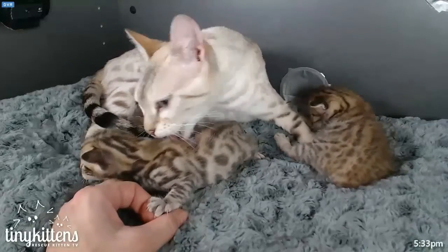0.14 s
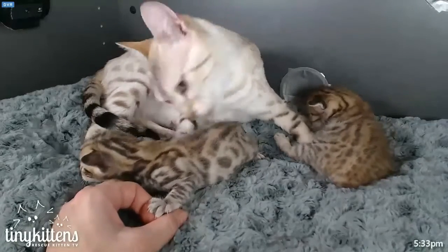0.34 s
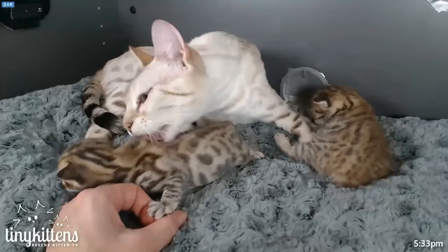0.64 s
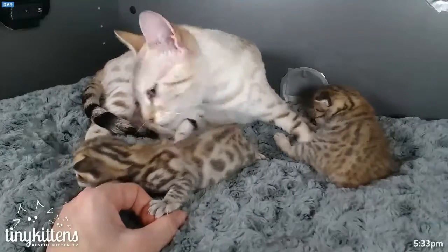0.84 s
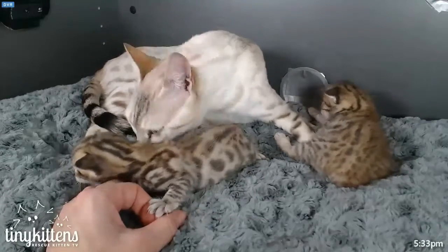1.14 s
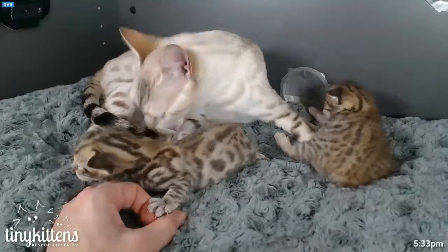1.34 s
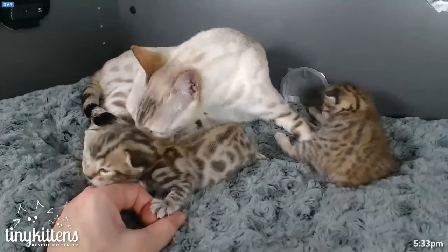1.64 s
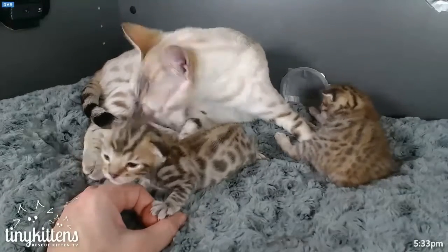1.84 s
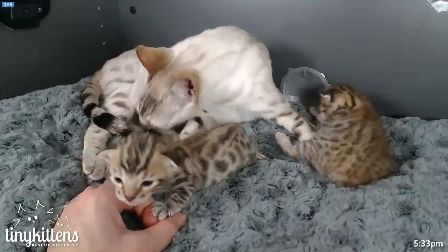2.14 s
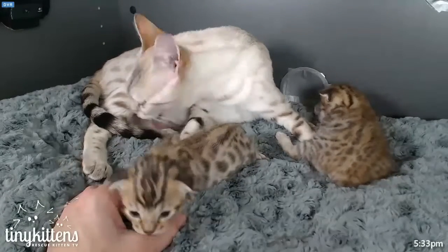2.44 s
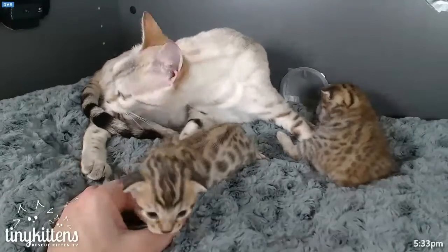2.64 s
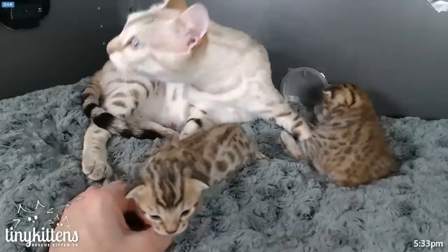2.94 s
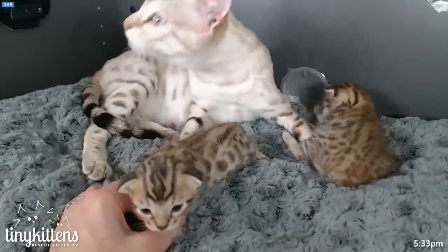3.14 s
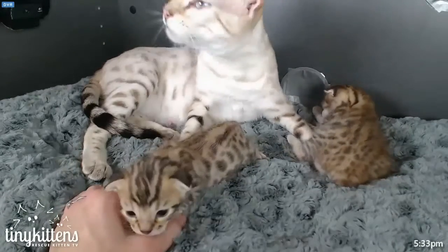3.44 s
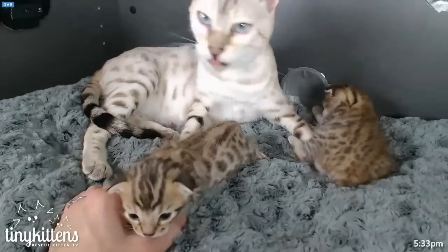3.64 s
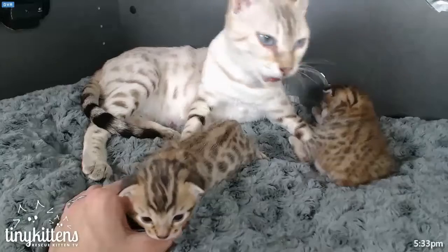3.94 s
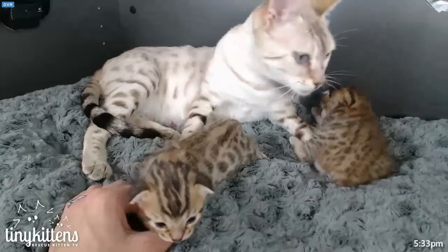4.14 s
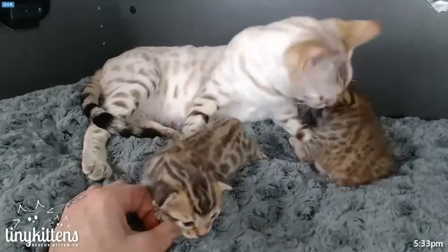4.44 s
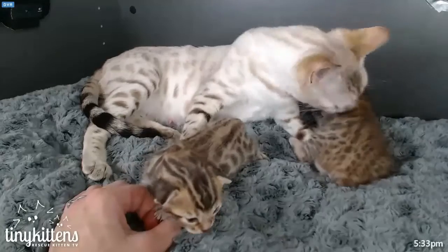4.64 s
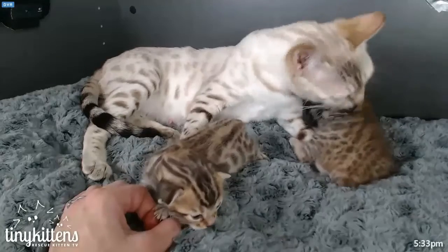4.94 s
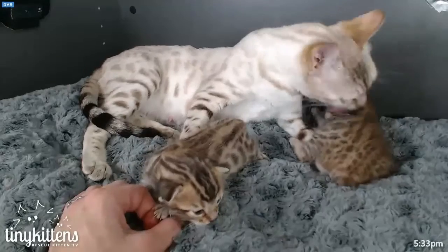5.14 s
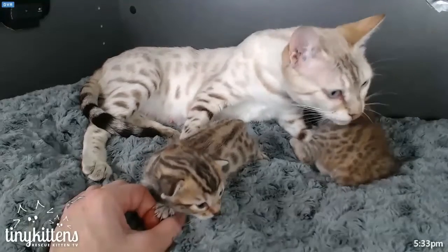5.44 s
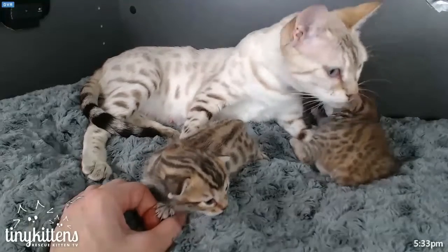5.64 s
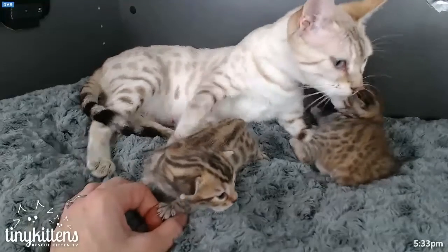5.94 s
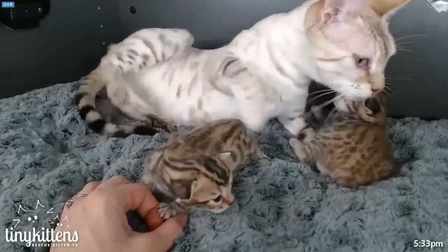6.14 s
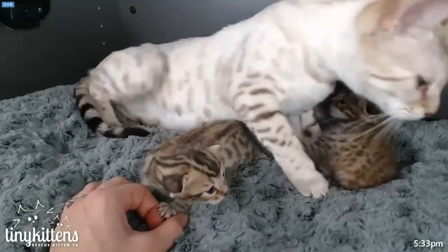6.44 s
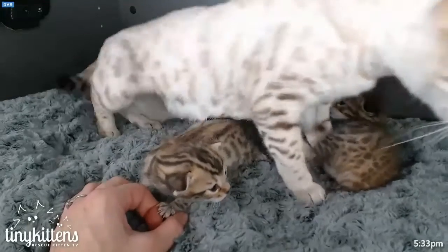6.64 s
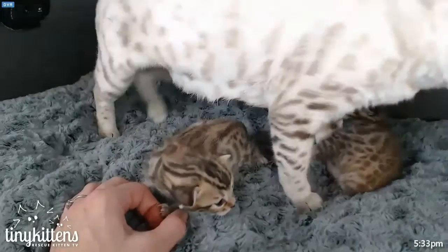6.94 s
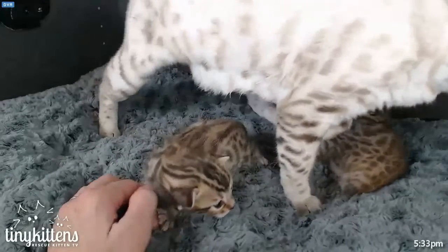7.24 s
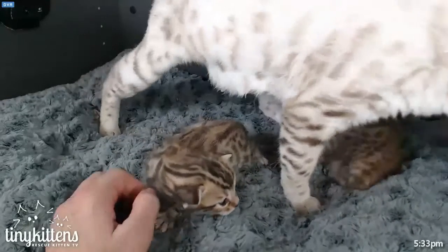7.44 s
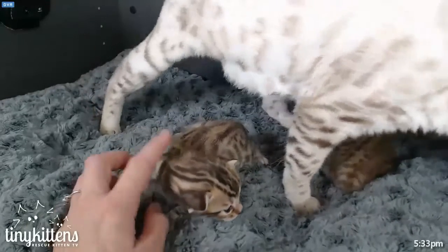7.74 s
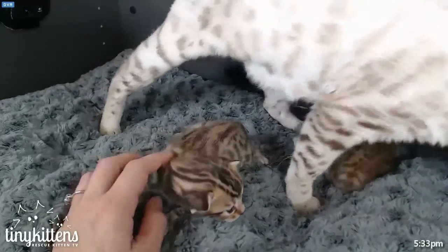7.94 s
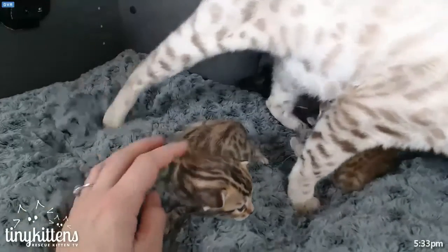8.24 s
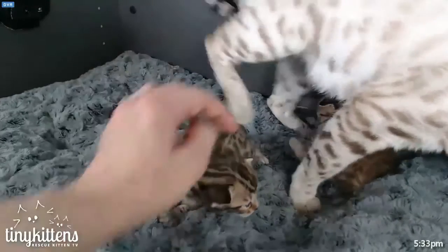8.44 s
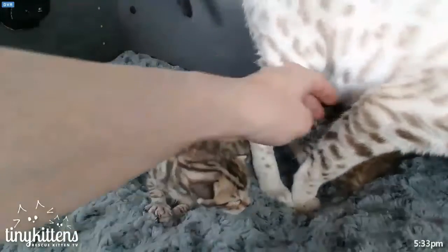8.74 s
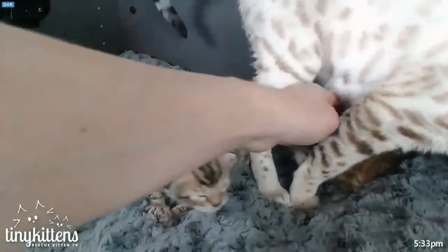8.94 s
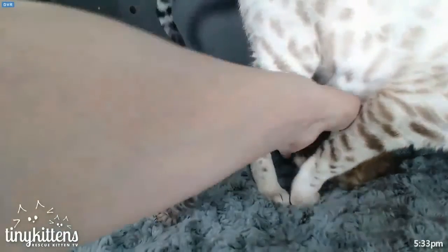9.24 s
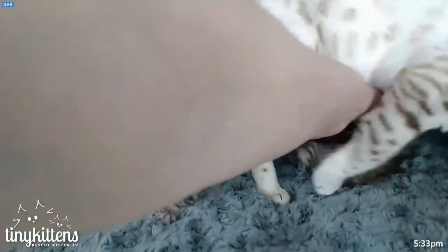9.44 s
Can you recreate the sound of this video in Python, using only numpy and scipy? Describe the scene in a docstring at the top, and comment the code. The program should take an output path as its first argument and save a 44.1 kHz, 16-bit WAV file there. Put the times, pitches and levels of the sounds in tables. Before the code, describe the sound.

A mother cat purrs close to the microphone in a small room, a low flutter that swells and fades with each breath. Her tongue brushes and smacks softly on fur, and the bedding gives a few dull bumps. A little past halfway a kitten lets out one tiny squeak. Toward the end the purr turns raspier and rattles in her throat. A faint appliance hum lies underneath.

```python
"""Purring mother cat with her kittens

A mother cat purrs while she licks her kittens on a plush blanket, then stands up and is stroked.
Her purr is a train of soft chest thumps, each with a puff of air that rasps in her throat.
Tongue and paws brush, smack and tick on the fur, the bed bumps and rumbles, and one kitten squeaks.
Under it all an appliance hums in the small room, along with a thin electronic whine."""
import sys
import numpy as np
from scipy import signal
from scipy.fft import rfft, irfft
from scipy.io import wavfile
from scipy.ndimage import uniform_filter1d

SR = 44100
rng = np.random.default_rng(int(sys.argv[2]) if len(sys.argv) > 2 else 0)


def transcribe(u):
    """Save the signal u as a 16-bit wav file named by the first command-line argument.

    u: samples, shape (n,) or (channels, n), limited to [-1, 1]; the rate is SR.
    q: integer samples, one column per channel.
    """
    v = np.clip(np.atleast_2d(u).T, -1, 1)
    q = np.round(v * 32767).astype(np.int16)
    wavfile.write(sys.argv[1], SR, q)


N = 423915
TIME = np.arange(N) / SR

# Colour of the room air. Each row: frequency in Hz, relative gain in dB.
AIR_EQ = [(10, -26.5), (25, 0), (55, 0), (100, 0), (150, -2.5), (205, -19), (300, -19.5), (380, -23.5),
          (450, -18.5), (560, -25), (690, -22), (850, -27.5), (1300, -30.5), (2000, -37), (3200, -38),
          (4500, -47), (6300, -49), (8000, -52.5), (10500, -55.5)]
# Mains hum and the appliance's faint motor tones. Each row: frequency in Hz, level in dB.
HUM_TONES = [(119.8, -55.2), (420, -84), (463, -82.5), (631, -84), (700, -85), (1109, -91), (1237, -92)]
# Electronic whines. Each row: frequency in Hz, level in dB, phase swing in radians, throb from 0 to 1.
WHINE_TONES = [(5475, -88.3, 1.57, 0), (5000, -100.5, 0, 0), (5599, -101.5, 0, 0), (6998, -106, 0, 0),
               (7999, -105, 0, .9), (10524, -103, 1.57, 0)]
# Rumble of the bed as the cat shifts and stands. Each row: time in seconds, level in dB.
RUMBLE_LEVELS = [(0, -65), (1.5, -61), (2.5, -68), (5.5, -71.5), (6.3, -59.5), (7.1, -71), (7.7, -68),
                 (8.3, -57.5), (9, -66), (9.6, -53)]
# Colour of that rumble. Each row: frequency in Hz, relative gain in dB.
RUMBLE_EQ = [(10, -19.5), (25, 6.0), (55, -1.5), (80, -5.5), (130, -21.5), (400, -60.0)]

# Swells of the purr, one or more to a breath. Each row: start in seconds, pulses per second,
# time to the crest in seconds, thump level in dB, rasp level in dB.
PURR_SWELLS = [(.005, 28.7, .08, -46, -70), (.419, 32.4, 0, -47.5, -78), (.551, 28.4, 0, -42.5, -76),
               (.885, 31, .01, -52.5, -78), (1.13, 28.8, .12, -44, -75), (1.408, 31, .03, -48, -79),
               (1.677, 28.7, .07, -49, -80), (1.924, 29.3, .03, -51, -79), (2.302, 28, .06, -44.5, -74),
               (2.654, 26.7, .03, -42.5, -77), (2.906, 30.7, .07, -49, -76), (3.183, 29.2, .04, -42.5, -73),
               (3.385, 29.5, .01, -47.5, -77), (3.635, 30, .11, -47.5, -75), (4.183, 28.4, .2, -41.5, -72),
               (4.466, 27.7, .12, -39, -71.5), (4.93, 29, .03, -48, -73), (5.273, 28.4, .03, -44.5, -73),
               (5.519, 32.9, 0, -50.5, -76), (5.783, 28.4, .06, -45.5, -75), (6.122, 31, .03, -52, -76),
               (6.426, 29.2, .03, -45.5, -75), (6.635, 31, 0, -48, -77), (6.795, 31, .05, -55, -74),
               (7.077, 28.4, 0, -45.5, -73.5), (7.183, 28.4, 0, -47.5, -75), (7.385, 31, .04, -54, -77),
               (7.63, 28.3, .09, -47, -75), (7.885, 31, 0, -51, -78), (8.157, 28.1, .12, -47, -69),
               (8.545, 27.3, 0, -42.5, -69), (8.656, 27.3, .11, -51, -67), (8.94, 27.3, 0, -44, -68),
               (9.26, 28.5, .06, -52, -65), (9.517, 26.2, .01, -47, -65)]
# Pitch of the chest thump, which drops as she stands. Each row: time in seconds, pitch in Hz.
CHEST_PITCH = [(0, 131), (4.6, 134), (6.2, 133), (6.9, 125), (9.6, 130)]
# How far her mouth is open. Each row: time in seconds, opening from 0 to 1.
MOUTH_OPENING = [(0, 0), (2.5, 0.32), (3.3, 0.64), (4.5, 0.14), (6.7, 0.06), (7.7, 0.8), (8.25, 0.9),
                 (9.6, 0.9)]
# Colours of the tissue flutter and of the rasp with the mouth shut and open.
# Each row: frequency in Hz, relative gain in dB.
FLUTTER_EQ = [(130, -14), (220, 1), (305, 5), (390, -3), (495, 3), (560, -8), (700, -17), (1200, -32),
              (3000, -55)]
MOUTH_SHUT_EQ = [(100, -18), (220, -2.5), (300, -4.5), (370, -5.5), (470, 5), (570, -5.5), (690, -10.5),
                 (850, -20), (1200, -12.5), (2000, -12.5), (3600, -18.5), (6000, -24), (11000, -34)]
MOUTH_OPEN_EQ = [(100, -22), (200, 0), (270, 23), (340, -5.5), (430, -4), (530, 0), (700, -6.5),
                 (1050, 2.5), (1370, 5), (1650, -18.5), (3300, -13.5), (6000, -18.5), (11000, -34)]

# Tongue and paws brush fur and blanket. Each row: start and end in seconds, then the levels of
# dull body, rasp and fizz in dB.
FUR_RUBS = [(0.047, 0.278, -71, -82, -94), (0.387, 0.647, -79, -77.5, -87.5),
            (0.877, 1.05, -82, -79.5, -84), (1.182, 1.342, -71, -93, -101), (2.025, 2.059, -61, -73, -80),
            (2.66, 2.75, -72, -83, -82.5), (2.837, 2.968, -66.5, -78, -81), (3.186, 3.336, -72, -86, -84),
            (3.606, 3.87, -63.5, -75, -81), (3.922, 3.947, -60.5, -71, -76.5),
            (3.955, 4.133, -79, -77, -83), (4.905, 5.24, -63.5, -76.5, -85), (5.284, 5.304, -56, -69, -76),
            (5.526, 5.696, -64, -74.5, -83), (5.8, 5.857, -59, -74, -90), (5.979, 5.989, -58.5, -66, -73.5),
            (6.142, 6.185, -64, -79, -86), (6.175, 6.274, -53, -67.5, -79.5),
            (6.258, 6.375, -61.5, -77, -86), (6.434, 6.531, -63.5, -72, -88), (6.513, 6.51, -65, -59, -64),
            (7.049, 7.192, -76, -77, -92), (7.41, 7.55, -68.5, -82, -90), (8.231, 8.312, -63, -74, -80),
            (8.423, 8.49, -66, -76, -92), (8.688, 8.895, -66, -78, -93), (9.238, 9.46, -66, -76, -86.5)]
# Colours of those three bands. Each row: frequency in Hz, relative gain in dB.
FUR_BODY_EQ = [(80, -18.5), (230, 15.5), (400, 4.5), (620, 5), (800, -3), (1100, -2.5), (1500, -4.5),
               (2200, -44), (5000, -50.5)]
FUR_RASP_EQ = [(600, -10), (1500, 4.5), (2300, 6), (2700, 2.5), (3300, 0.5), (4200, -5), (5500, -13),
               (8000, -35.5)]
FUR_FIZZ_EQ = [(2500, -12), (5000, 2.5), (6300, 3.5), (8000, -6.5), (9800, -2), (11000, -19)]
# Wet smacks of the tongue. Each row: start in seconds, length in seconds, level in dB,
# mouth resonance in Hz, its width in Hz.
TONGUE_SMACKS = [(0.047, 0.02, -61.5, 2033, 710), (0.397, .016, -74, 3050, 600),
                 (0.425, .018, -75, 3100, 900), (0.461, 0.018, -73, 3190, 900),
                 (0.461, 0.027, -70, 1330, 300), (.488, .014, -75, 2900, 1600),
                 (0.905, .022, -72, 1290, 200), (.917, .012, -72, 2600, 1400),
                 (0.942, 0.016, -62.5, 2290, 1200), (0.976, 0.014, -62, 3270, 420),
                 (0.976, 0.015, -66, 1900, 1400), (1.006, 0.02, -67, 2710, 1100),
                 (1.219, 0.013, -68.5, 2020, 1200), (1.626, 0.008, -64.5, 2440, 900),
                 (1.756, 0.045, -77.5, 2940, 700), (2.674, 0.014, -66, 3270, 1300),
                 (2.708, 0.02, -65.5, 2880, 750), (2.858, 0.017, -65, 3380, 800),
                 (2.882, 0.027, -67.5, 3440, 500), (2.897, 0.024, -70, 2440, 500),
                 (2.925, .018, -72, 2720, 1000), (3.21, 0.15, -77, 1547, 350),
                 (3.645, 0.071, -73.5, 1490, 300), (3.733, .055, -72.5, 1370, 500),
                 (3.808, 0.047, -72, 1432, 400), (3.808, 0.013, -69.5, 3420, 900),
                 (3.919, .012, -69, 1500, 700), (4.06, 0.02, -69.5, 2710, 1100),
                 (4.092, 0.053, -76.5, 3410, 700), (4.236, 0.011, -68.5, 3500, 1200),
                 (4.643, 0.006, -69.5, 3860, 900), (4.781, 0.03, -70.5, 2990, 804),
                 (5.017, 0.013, -68, 2610, 1400), (5.051, .012, -69, 2720, 1400),
                 (5.14, .016, -71, 1500, 700), (5.248, .01, -70.5, 3060, 1100),
                 (5.284, 0.018, -59.5, 2220, 700), (5.285, 0.024, -70, 3300, 500),
                 (5.561, .018, -71.5, 2980, 900), (5.594, .017, -67.5, 2630, 1200),
                 (5.625, .018, -68.5, 2700, 1100), (5.658, 0.017, -72.5, 2510, 1300),
                 (6.511, .008, -61, 2790, 2200), (8.25, 0.072, -72.5, 2900, 900)]
# Ticks of tongue, lips and claws in the pile. Each row: start in seconds, relative level in dB,
# brightness in dB.
SMALL_TICKS = [(0.0472, -56.5, -11.5), (0.611, -68, -8), (1.2222, -65.5, -10), (1.256, -71, -9),
               (1.5174, -66, 3.5), (2.0403, -64.5, -10), (2.1162, -67, 1), (2.526, -79, 10),
               (2.6735, -68, -14), (2.7018, -68, 2), (2.999, -71.5, 1.5), (3.1509, -63.5, -14.5),
               (3.228, -74, -2), (4.28, -72, -5), (4.619, -67, -5), (5.2822, -63.5, -14.5),
               (5.811, -65, -15), (6.054, -74, 4), (6.063, -66, 7), (6.5129, -57, -5), (6.9728, -75, -1),
               (9.1576, -76.5, 8.5), (9.3774, -72, 7)]
# Colour of a tick's hollow knock. Each row: frequency in Hz, relative gain in dB.
TICK_KNOCK_EQ = [(80, -16.5), (230, -6), (400, 5), (540, 9.5), (750, -0.5), (1000, -1), (1500, -2.5),
                 (2200, -38), (5000, -52.5)]
# Paws and bodies bump the bedding. Each row: start in seconds, level in dB, pitch in Hz,
# length in seconds.
BED_BUMPS = [(1.771, -49.5, 217, 0.021), (2.034, -47.5, 213, 0.039), (2.187, -56, 206, 0.052),
             (2.875, -52, 210.5, 0.076), (4.996, -51.5, 235, 0.084), (5.052, -59, 332, 0.044),
             (5.128, -57.5, 322, 0.045), (8.698, -53, 250, 0.04), (8.858, -54.5, 255, 0.031),
             (6.018, -44, 140, .022), (6.222, -40.5, 168, 0.04), (6.224, -51, 350, .02),
             (6.885, -59, 285, .035)]

# Arc of the kitten's squeak. Each row: time in seconds, pitch in Hz, level in dB.
SQUEAK_ARC = [(6.012, 1020, -76), (6.017, 1075, -57), (6.03, 1102, -55.5), (6.042, 1065, -57),
              (6.047, 950, -66), (6.054, 860, -65), (6.06, 800, -76)]
# Timbre of the squeak. Each row: harmonic number, relative level in dB.
SQUEAK_HARMONICS = [(1, -9), (2, -3), (3, 0), (4, -20), (5, -29), (6, -30), (7, -31), (8, -30), (9, -26)]
# Single purr pulses rattle in her throat once she stands. Each row: start in seconds, then the
# relative levels of body and ring in dB.
THROAT_RATTLES = [(7.69, -54, -69), (7.727, -51, -75), (7.762, -58, -75), (8.15, -56, -69),
                  (8.182, -57, -65), (8.293, -59, -70), (8.397, -51, -69), (8.432, -49, -72),
                  (8.471, -53, -69), (8.578, -53, -73), (8.596, -47, -59), (8.684, -52, -68),
                  (8.718, -61, -73), (8.753, -52, -68), (8.789, -46.5, -61), (8.86, -53, -81),
                  (8.965, -64, -65), (9.002, -55, -60), (9.038, -52, -71), (9.309, -46, -58),
                  (9.351, -61, -59), (9.381, -68, -69), (9.412, -51, -65), (9.45, -53, -66),
                  (9.537, -56, -61.5), (9.584, -51, -61.5)]
# Colours of a rattle's hollow body and its ring in the mouth. Each row: frequency in Hz, gain in dB.
RATTLE_BODY_EQ = [(120, -13), (200, -3), (275, 10), (480, -1), (720, 8.5), (1000, -15), (1650, -19),
                  (3500, -25), (9000, -38)]
RATTLE_RING_EQ = [(500, -50), (1050, -6.5), (1350, 1), (1480, -13.5), (1700, -26), (4000, -38.5)]


def gain_of(db):
    """Decibels to amplitude."""
    return 10 ** (np.asarray(db) / 20)


def unit_rms(x):
    """Scales to an rms of 1."""
    return x / np.sqrt(np.mean(x ** 2) + 1e-20)


def add(mix, start_s, sound):
    """Lays a sound into the mix."""
    part = mix[max(round(start_s * SR), 0):][:len(sound)]
    part += sound[:len(part)]


def swell(t, rise_s):
    """Envelope that rises to 1 at rise_s, then dies away."""
    return t / rise_s * np.exp(1 - t / rise_s)


def drift(rate_hz):
    """Smooth random wander of rms 1, rolling off above rate_hz."""
    step, size = 16, 32768
    hz = np.fft.rfftfreq(size, step / SR)
    coarse = irfft(rfft(rng.standard_normal(size)) * np.exp(-(hz / rate_hz) ** 2), size)
    return unit_rms(np.interp(np.arange(N) / step, np.arange(size), coarse))


def colour(x, eq, size=8192):
    """Minimum-phase EQ of unit energy."""
    eq_hz, eq_db = np.transpose(eq)
    hz = abs(np.fft.fftfreq(size, 1 / SR))
    log_gain = np.log(gain_of(np.interp(np.log(hz + 1), np.log(eq_hz + 1), eq_db)))
    impulse = np.fft.ifft(np.exp(np.conj(signal.hilbert(log_gain)))).real[:size // 2]
    return signal.oaconvolve(x, impulse / np.linalg.norm(impulse))[:len(x)]


def room_air(level_db=-54.6, flicker_db=1.0):
    """A bed of dark noise whose level flickers slightly."""
    level = gain_of(level_db + flicker_db * drift(9.1))
    return level * unit_rms(colour(rng.standard_normal(N), AIR_EQ))


def appliance_hum(wander_s=.00025):
    """Mains hum and motor tones waver a little in pitch, all together."""
    motor_time = TIME + wander_s * drift(2)
    return sum(gain_of(db) * unit_rms(np.sin(2 * np.pi * hz * motor_time)) for hz, db in HUM_TONES)


def electronic_whine(chop_hz=30):
    """Thin high tones; the electronics chop some of them in phase or level at a steady beat."""
    flip = np.tanh(8 * np.sin(np.pi * chop_hz * TIME))
    beat = np.cos(2 * np.pi * chop_hz * TIME)
    out = np.zeros(N)
    for hz, db, swing, throb in WHINE_TONES:
        tone = np.sin(2 * np.pi * hz * TIME + swing * flip)
        out += gain_of(db) * unit_rms((1 + throb * beat) * tone)
    return out


def bed_rumble():
    """The bed sways under moving weight."""
    sway = unit_rms(colour(rng.standard_normal(N), RUMBLE_EQ))
    return sway * gain_of(np.interp(TIME, *np.transpose(RUMBLE_LEVELS)))


def purr_envelopes(swell_db=6, hold_share=.12, fade_db_per_s=75, rasp_share=.55):
    """Thump and rasp gains: each swell rises to its crest, holds, and fades as the air runs out."""
    columns = np.transpose(PURR_SWELLS)
    current = np.maximum(np.searchsorted(columns[0], TIME + .012) - 1, 0)
    start, _, crest, thump_db, rasp_db = columns[:, current]
    age = TIME + .006 - start
    hold = hold_share * np.diff(columns[0], append=N / SR)[current]
    shape_db = -swell_db * np.clip((crest - age) / np.maximum(crest, hold), 0, 1)
    shape_db -= fade_db_per_s * np.maximum(age - crest - hold, 0)
    return gain_of(thump_db + shape_db), gain_of(rasp_db + rasp_share * shape_db)


def chest_thumps(onsets, forces, lead_s, swell_cycles=.49, pitch_spread=.035, ring_hz=126, ring_db=-18.5):
    """At each pulse the soft chest swings about two cycles, then rings on faintly."""
    t = np.arange(SR // 10) / SR
    ring = gain_of(ring_db) * swell(t, rise_s=.014) * np.cos(2 * np.pi * ring_hz * (t - lead_s))
    pitches = np.interp(onsets / SR + lead_s, *np.transpose(CHEST_PITCH))
    pitches *= 1 + pitch_spread * drift(9)[onsets]
    out = np.zeros(N)
    for start, hz, force in zip(onsets / SR, pitches, forces):
        age = t * hz / swell_cycles
        envelope = age ** 2 * np.exp(-age)
        thump = envelope / envelope.max() * np.cos(2 * np.pi * hz * (t - lead_s)) + ring
        add(out, start, force * thump / np.linalg.norm(thump))
    return out


def air_puffs(pulses, rise_s, leak=.1):
    """Each pulse lets a puff of air through, over a small steady leak."""
    puff = swell(np.arange(SR // 10) / SR, rise_s)
    flow = signal.oaconvolve(pulses, puff)[:N] + leak
    return unit_rms(flow * rng.standard_normal(N))


def tissue_flutter(pulses, effort, level_db=-14.5, growth=2.5, puff_s=.0029):
    """Hard pulses set the soft tissue fluttering, part alike each cycle, part ragged."""
    alike = unit_rms(np.roll(pulses, round(puff_s * SR)))
    ragged = air_puffs(pulses, puff_s)
    hardness = effort.max() * (effort / effort.max()) ** growth
    return gain_of(level_db) * hardness * colour(.6 * alike + .7 * ragged, FLUTTER_EQ)


def throat_rasp(pulses, gust_db=2.5):
    """Uneven gusts rasp in the throat and change colour as the mouth opens."""
    air = air_puffs(pulses * gain_of(gust_db * drift(37)), rise_s=.004)
    opening = np.interp(TIME, *np.transpose(MOUTH_OPENING))
    return (1 - opening) * colour(air, MOUTH_SHUT_EQ) + opening * colour(air, MOUTH_OPEN_EQ)


def purr(lead_s=.0062, jitter_s=.0002, uneven_db=1):
    """Each opening of the larynx thumps the chest and lets a puff of air through the throat."""
    ends = [row[0] for row in PURR_SWELLS[1:]] + [N / SR + .01]
    beat_times = np.concatenate([np.arange(start, end - .5 / rate, 1 / rate)
                                 for (start, rate, *_), end in zip(PURR_SWELLS, ends)])
    lateness, strength = rng.standard_normal((len(beat_times), 2)).T
    # the larynx opens a moment before the thump peaks
    onsets = np.clip((beat_times - lead_s + jitter_s * lateness) * SR, 0, N - 1).astype(int)
    pulses = np.zeros(N)
    pulses[onsets] = gain_of(uneven_db * strength)
    effort, rasp_gain = purr_envelopes()
    thumps = chest_thumps(onsets, (unit_rms(pulses) * effort)[onsets], lead_s)
    return thumps + tissue_flutter(pulses, effort) + rasp_gain * throat_rasp(pulses)


def fur_rubs(snap_db=3.0, snaps_per_s=3000, clump_db=2, clump_hz=220, catch_db=1.4, catch_hz=45):
    """Tongue or paw catches and slides; hairs slip free in clumps, each with a tiny snap."""
    shared_db = clump_db * drift(clump_hz) + catch_db * drift(catch_hz)
    starts, ends, *band_levels = np.transpose(FUR_RUBS)
    out = np.zeros(N)
    for eq, levels in zip((FUR_BODY_EQ, FUR_RASP_EQ, FUR_FIZZ_EQ), band_levels):
        pressure = np.zeros(N)
        for start, end, db in zip(starts, ends, levels):
            samples = max(int((end - start) * SR), 9)
            add(pressure, start, gain_of(db) * signal.windows.tukey(samples, alpha=.28))
        snaps = gain_of(snap_db * np.minimum(rng.exponential(1, N), 4)) * rng.choice([-1, 1], N)
        snaps *= rng.random(N) < snaps_per_s / SR
        clumps = gain_of(shared_db + clump_db * drift(clump_hz))
        # the catches roughen the rub while its average force holds
        clumps /= np.sqrt(uniform_filter1d(clumps ** 2, size=2600))
        out += pressure * colour(unit_rms(snaps * clumps), eq)
    return out


def licks(pops_per_s=1100, glide=.053, hold_share=.7):
    """The tongue peels off wet fur: tiny pops ring the mouth cavity, whose pitch sinks as it grows."""
    rise_s, release_s, trail_s, trail_db = .002, .005, .02, -18
    out = np.zeros(N)
    for start, length, db, cavity_hz, width_hz in TONGUE_SMACKS:
        t = np.arange(0, length + 2 * trail_s, 1 / SR)
        chance, angle = rng.random((2, len(t)))
        pops = (chance < pops_per_s / SR) * np.exp(2j * np.pi * angle)
        ringing = signal.lfilter(*signal.butter(2, width_hz / 2, fs=SR), pops)
        pitch = cavity_hz * (1 + glide * (.5 - np.minimum(t / length, 1)))
        cavity = (ringing * np.exp(2j * np.pi * np.cumsum(pitch) / SR)).real
        after = np.maximum(t - hold_share * length, 0)
        release = np.maximum(np.exp(-after / release_s), gain_of(trail_db) * np.exp(-after / trail_s))
        smack = np.minimum(t / rise_s, 1) * release * cavity
        add(out, start, gain_of(db) * unit_rms(smack) * np.sqrt(length / t[-1]))
    return out


def ticks(snap_s=.0014, click=5.5, crackle_db=-10, crackle_t60_s=.056, rasp_db=.5):
    """Tongue, lip or claw snaps, then crackles briefly; a bright tick trades body for treble."""
    t = np.arange(SR // 10) / SR
    envelope = np.exp(-t / snap_s) + gain_of(crackle_db - 60 * t / crackle_t60_s)
    bands = np.zeros((3, N))
    for start, db, bright_db in SMALL_TICKS:
        for band, offset_db in zip(bands, (-bright_db, rasp_db, bright_db)):
            burst = envelope * rng.standard_normal(len(t))
            burst[0] = click
            add(band, start, gain_of(db + offset_db) * burst)
    return sum(colour(band, eq) for band, eq in zip(bands, (TICK_KNOCK_EQ, FUR_RASP_EQ, FUR_FIZZ_EQ)))


def bed_bumps(sag=.057, ragged=.13):
    """The padded bed gives a brief, ragged low note that sinks as the weight settles."""
    creases = drift(rate_hz=200)
    out = np.zeros(N)
    for start, db, hz, length in BED_BUMPS:
        progress = np.linspace(0, 1, int(length * SR))
        pitch = hz * (1 + sag * (.5 - progress) + ragged * creases[int(start * SR):][:len(progress)])
        note = np.sin(2 * np.pi * np.cumsum(pitch) / SR)
        add(out, start, gain_of(db) * np.sin(np.pi * progress) * note)
    return out


def kitten_squeak(roughness=.0091):
    """A tiny arched call with a clean stack of harmonics."""
    times, hz, db = np.transpose(SQUEAK_ARC)
    t = np.arange(times[0], times[-1], 1 / SR)
    pitch = np.interp(t, times, hz) * (1 + roughness * drift(400)[:len(t)])
    phase = 2 * np.pi * np.cumsum(pitch) / SR
    voice = sum(gain_of(harmonic_db) * np.sin(k * phase) for k, harmonic_db in SQUEAK_HARMONICS)
    out = np.zeros(N)
    add(out, times[0], unit_rms(voice) * gain_of(np.interp(t, times, db)))
    return out


def throat_rattles(body_trim_db=-7.0, ring_trim_db=-1.0, body_rise_s=.0022, ring_rise_s=.004):
    """Hollow puffs swell and fade, each with its own blend of throat body and mouth ring."""
    t = np.arange(SR // 16) / SR
    starts, body_db, ring_db = np.transpose(THROAT_RATTLES)
    out = np.zeros(N)
    for eq, levels, rise_s in [(RATTLE_BODY_EQ, body_db + body_trim_db, body_rise_s),
                               (RATTLE_RING_EQ, ring_db + ring_trim_db, ring_rise_s)]:
        air = colour(rng.standard_normal(N + len(t)), eq)
        envelope = swell(t, rise_s)
        for start, db in zip(starts, levels):
            puff = unit_rms(envelope * air[int(start * SR):][:len(t)])
            add(out, start, gain_of(db) * puff * np.sqrt(np.mean(envelope ** 2)))
    return out


def nest_walls(x, wet_db=-9.0, t60_s=.22, predelay_s=.003):
    """The near walls of the nest add a short soft tail."""
    t = np.arange(SR // 4) / SR
    tail = rng.standard_normal(len(t)) * gain_of(-60 * t / t60_s) * (t > predelay_s)
    return x + gain_of(wet_db) * signal.oaconvolve(x, tail / np.linalg.norm(tail))[:N]


def scene():
    """The cats close by, over the tone of the room, in mono."""
    grooming = fur_rubs() + licks() + ticks()
    low_end = purr() + bed_bumps() + bed_rumble()
    details = nest_walls(grooming + throat_rattles() + kitten_squeak())
    room_tone = room_air() + appliance_hum() + electronic_whine()
    return (low_end + details + room_tone)[None]


def record(dry, cutoff_hz=11000):
    """A steep low-pass takes off the top treble."""
    lowpass = signal.firwin(255, cutoff_hz, window=("kaiser", 8), fs=SR)
    return signal.oaconvolve(dry, lowpass[None], "same")


dry = scene()
out = record(dry)
transcribe(out)
```